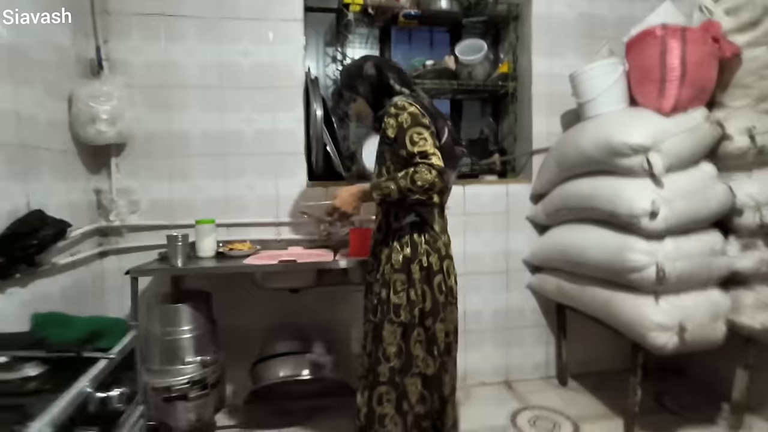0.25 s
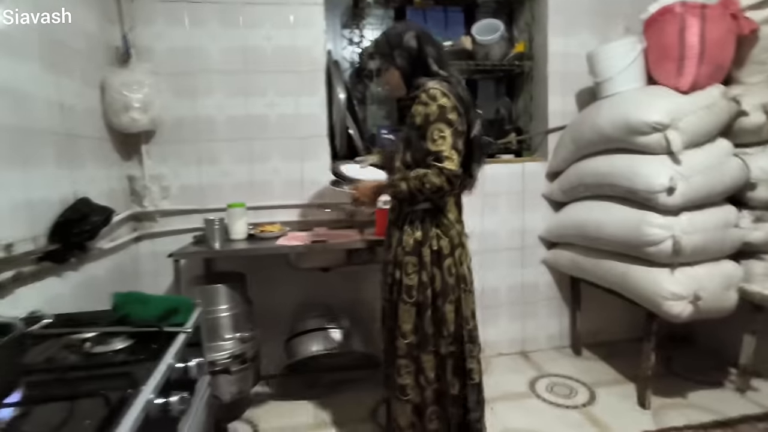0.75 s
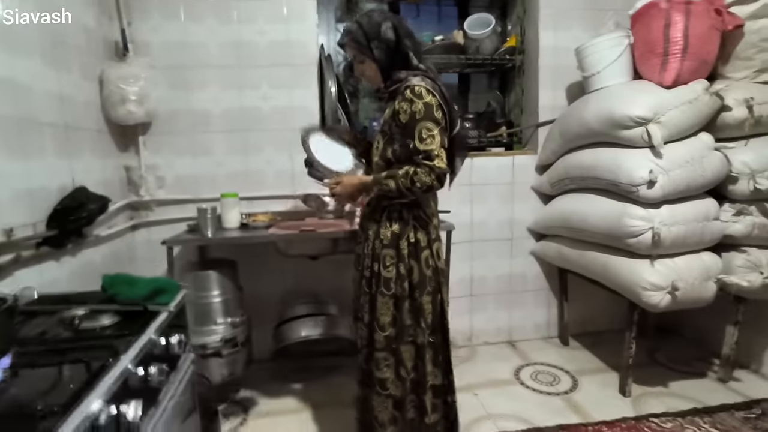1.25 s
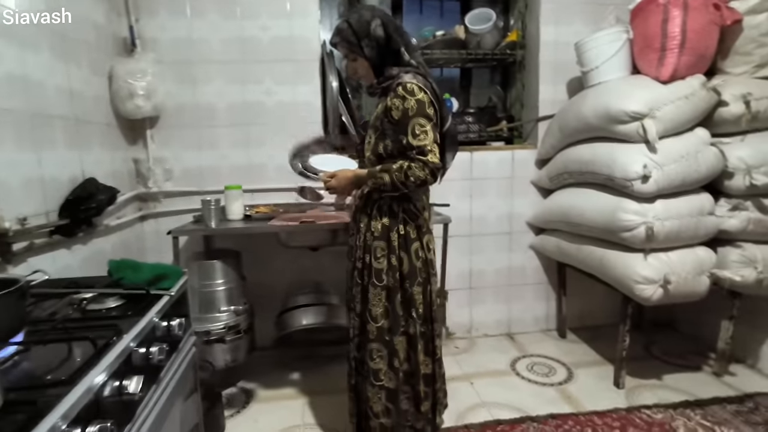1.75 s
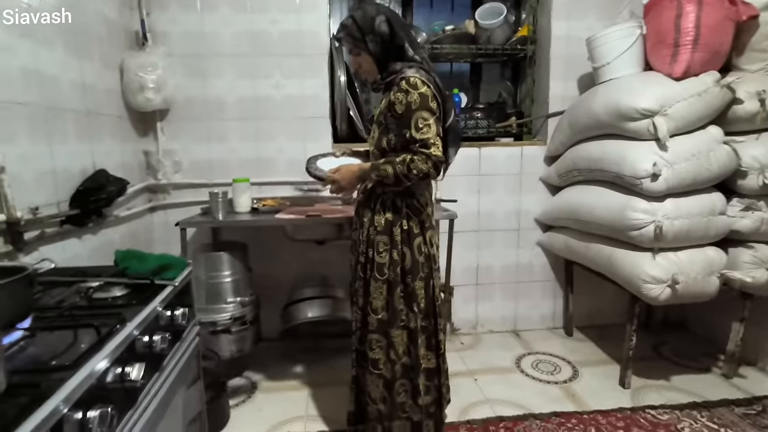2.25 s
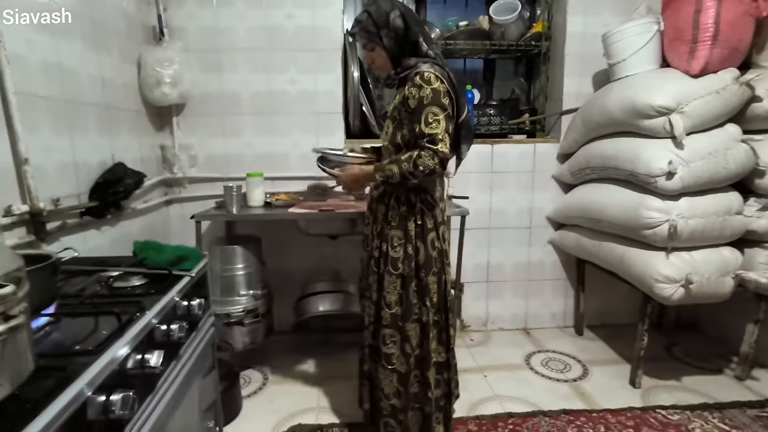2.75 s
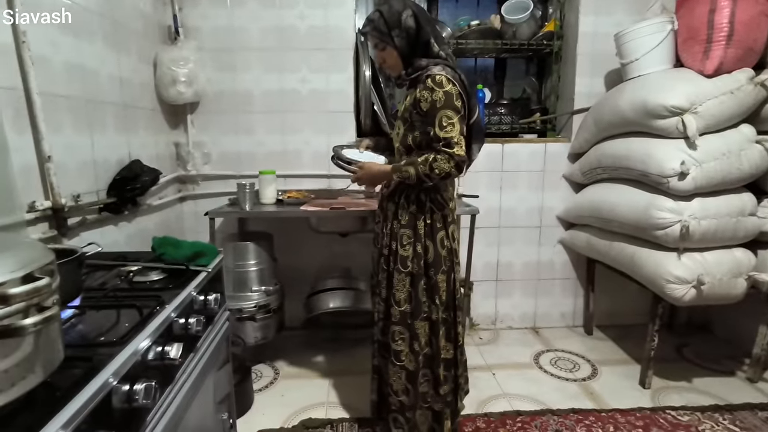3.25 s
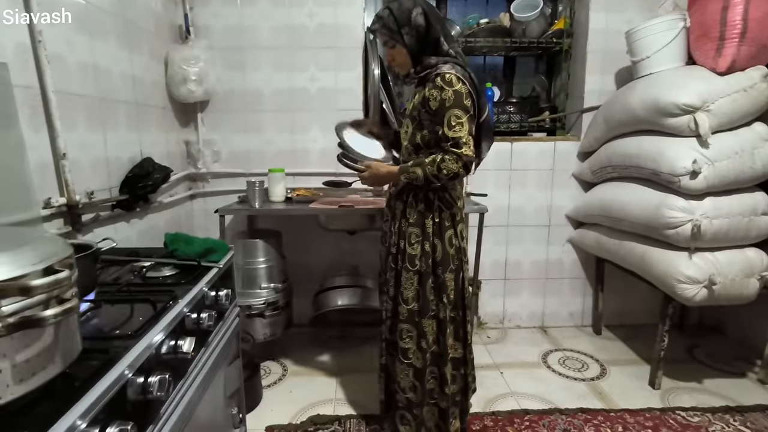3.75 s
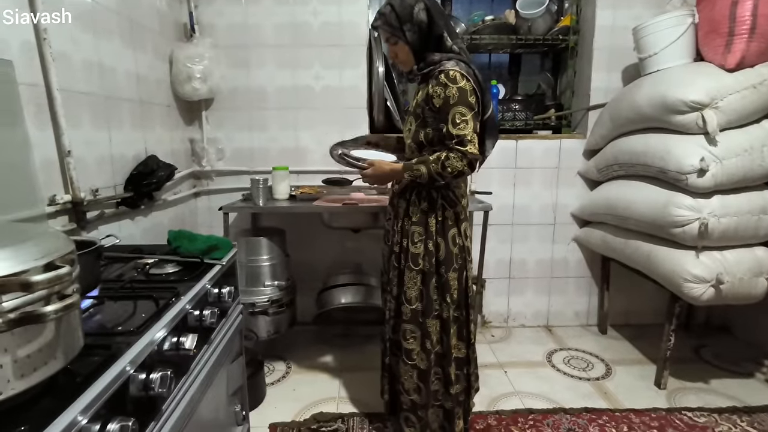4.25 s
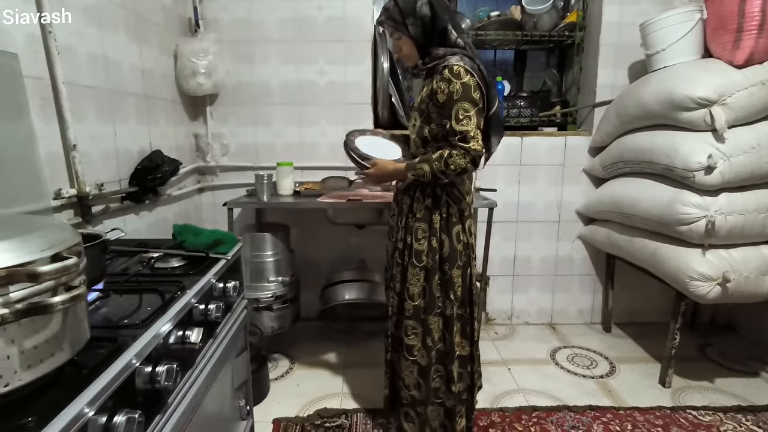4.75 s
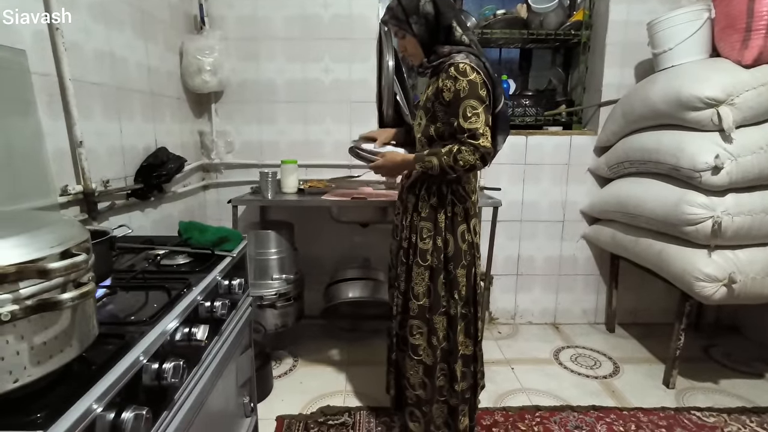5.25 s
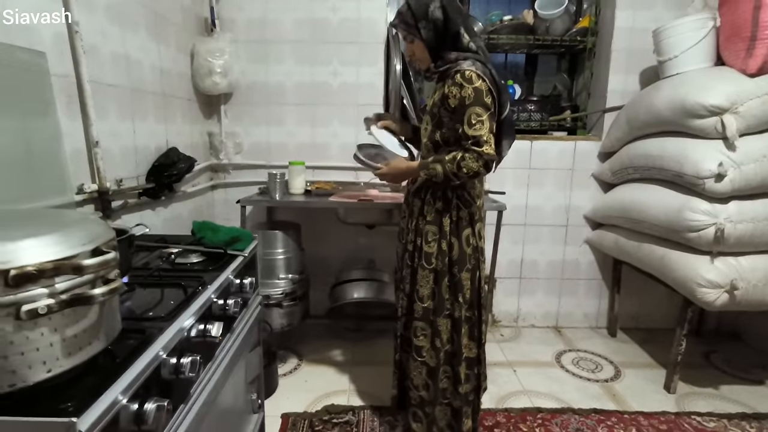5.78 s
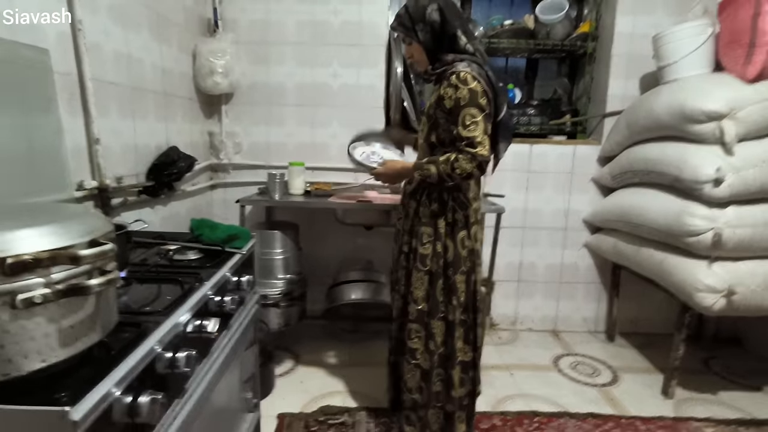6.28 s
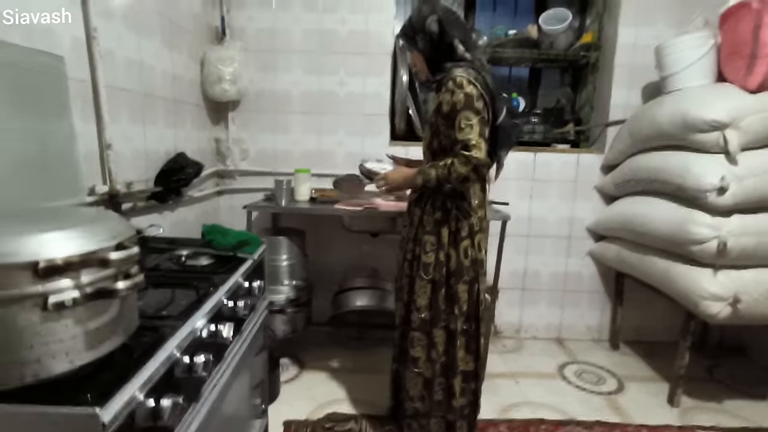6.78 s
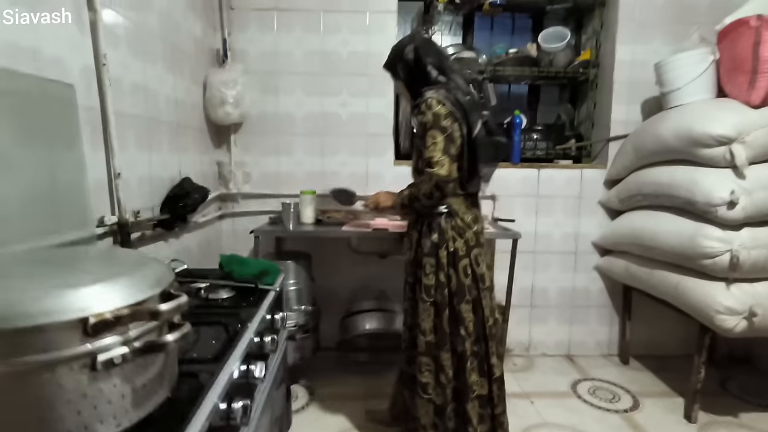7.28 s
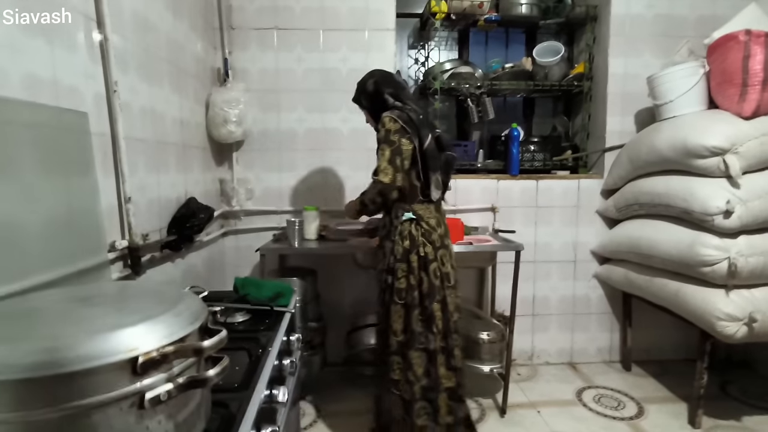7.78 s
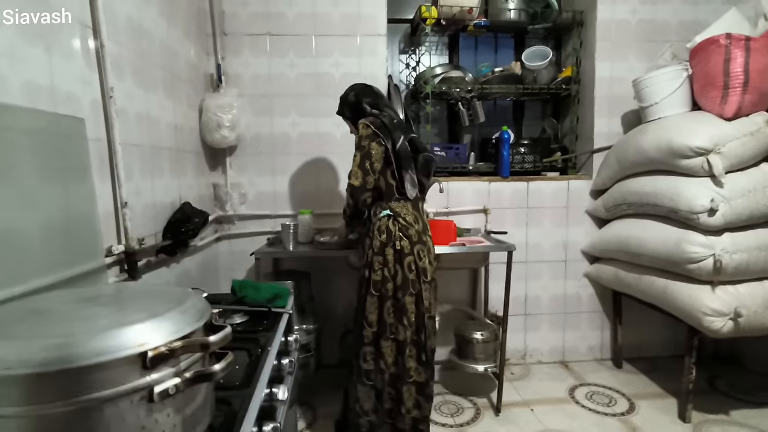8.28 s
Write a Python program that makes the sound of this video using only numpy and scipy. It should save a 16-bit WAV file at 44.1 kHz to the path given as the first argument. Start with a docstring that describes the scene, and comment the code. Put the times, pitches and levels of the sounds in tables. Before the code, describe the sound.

Bright, irregular clinks and clatters come from metal plates being sorted in the hands, each knock leaving a short ring. Rims scratch softly as they slide. Near the end the plates clash and scrape more loudly, and the pile is put down on a metal table with a rattle and low thumps. It is heard from nearby in a small, slightly echoing kitchen with a faint hum and a very high electrical whine.

```python
"""A small tiled kitchen: thin metal plates are lifted one by one and dropped back on a hand-held stack,
which is then put down on a steel table. Each impact chatters and excites the bending modes of the top
plate; sliding rims scratch by stick-slip, and heavy landings thud and set the table top booming.
Behind it are room air, a low hum and a very high electrical whine. The two microphone ports
resonate near 7 and 8 kHz."""
import sys
import numpy as np
from scipy import signal
from scipy.fft import rfft, irfft
from scipy.io import wavfile

SR = 44100
rng = np.random.default_rng(int(sys.argv[2]) if len(sys.argv) > 2 else 0)


def generate_wav(signal):
    """Clip the signal to [-1, 1] and save it as 16-bit WAV at the path in sys.argv[1]."""
    frames = np.transpose(np.atleast_2d(signal))
    scaled = np.clip(frames, -1, 1) * 32767
    pcm = np.round(scaled).astype(np.int16)
    wavfile.write(sys.argv[1], SR, pcm)


N = 375732
SIZE, ATTACK_SIZE = 32768, 1764  # samples in one event and in its attack
AGE, BINS = np.arange(SIZE) / SR, np.fft.rfftfreq(SIZE, 1 / SR)  # an event's t/s and f/Hz

# clear normal modes of each plate or stack: f/Hz, level/dB, nominal T60/s
DEEP_PLATE = [(468, 0, .4), (899, -13, .4), (2160, -11, .35), (6406, -20, .3), (8452, -12, .2)]
WIDE_PLATE = [(738, 0, .39), (1470, -19, .35), (2164, -11, .3), (2735, -20, .3), (7080, -14, .28)]
SMALL_PLATE = [(727, -4, .45), (974, -3, .28), (1453, -8, .4), (1798, -8, .35), (3285, -1, .38),
               (4010, 0, .42), (5453, -2, .25), (6374, -1, .35)]
STACK = [(667, 5, 0.35), (701, -16, 0.088), (1070, -32, 0.75), (1428, 5.5, 0.47), (2125, 9, 0.44),
         (3300, -26, .35), (6200, 4, 0.31), (7150, -3, 0.2)]
SHALLOW_PLATE = [(550, -33, 0.38), (1660, -18, 0.25), (2184, 6.5, 0.076), (2800, -20, 0.76),
                 (4460, -9, 0.48), (5200, 1, 0.08), (7467, -10, 0.21)]
FULL_STACK = [(515, 2.5, 0.23), (880, -1, 0.91), (2160, 4.5, 0.35), (5140, -11, 0.27), (5330, -11, 0.26),
              (6160, 0, 0.44), (7250, -20, 0.25), (7130, -2, 0.31), (7240, -9, 0.18)]
STACK_ON_TABLE = [(1766, -10, .3), (2183, -6, .4), (2950, -7, .3), (3564, -8, .35), (4440, -4, .3),
                  (5572, 0, .4), (6158, -4, .55), (6530, 1, .3), (8461, -2, .25)]
# what lies on top: from t/s, modes, hollow knock f/Hz, its bandwidth/Hz, relative body level/dB
ON_TOP = [(0, DEEP_PLATE, 490, 45, -3), (.3, WIDE_PLATE, 760, 80, -3.5), (1.3, SMALL_PLATE, 770, 300, -2),
          (1.9, STACK, 696, 110, 1.5), (2.4, SMALL_PLATE, 440, 110, -3.5), (2.7, STACK, 687, 70, -1),
          (4.45, STACK, 820, 300, -2.5), (4.7, SHALLOW_PLATE, 583, 60, -2),
          (4.85, SHALLOW_PLATE, 710, 116, -2.5), (5.5, WIDE_PLATE, 730, 70, -1.5),
          (6.5, FULL_STACK, 630, 302, -4), (6.65, FULL_STACK, 740, 140, 0.5),
          (6.75, FULL_STACK, 614, 200, -4.5), (7.5, FULL_STACK, 480, 139, -4),
          (8, STACK_ON_TABLE, 560, 140, -6.5)]
# spectral envelope of the dense modes of sheet metal: f/Hz, level/dB
SHEET_SPECTRUM = [(40, -27), (90, -19.5), (130, -9), (250, -3), (390, 1.5), (500, 3), (650, 0.5),
                  (1000, 1.5), (2200, 4), (4500, 1), (7000, 1), (10000, -5.5), (14000, -6)]


def amp(db):
    """Amplitude ratio of a level in decibels."""
    return 10 ** (np.asarray(db) / 20)


def rms(x):
    """Root mean square."""
    return np.sqrt(np.mean(x ** 2) + 1e-20)


def read(points, hz):
    """Interpolation of a table on a log-frequency axis."""
    f, value = np.transpose(points)
    return np.interp(np.log(hz + 1), np.log(np.sort(f) + 1), value)


def add(mix, s, sound):
    """Superposition: a stereo sound joins the mix at time s."""
    part = mix[:, max(round(s * SR), 0):][:, :sound.shape[1]]
    part += sound[:, :part.shape[1]]


def causal(db):
    """Minimum phase: the response with these gains that rings only after its cause."""
    log_gain = np.log(amp(db))
    return np.exp(np.conj(signal.hilbert(np.r_[log_gain, log_gain[-2:0:-1]])))[:len(db)]


def drift(rate_hz):
    """Low-pass noise: a random wander of unit RMS."""
    wander = irfft(rfft(rng.standard_normal(N)) / (1 + (np.fft.rfftfreq(N, 1 / SR) / rate_hz) ** 4), N)
    return wander / rms(wander)


def swell(rise_s):
    """Exponential build-up of a vibration."""
    return 1 - np.exp(-AGE / rise_s)


def port_pair(size, alike_hz=520):
    """Diffuse-field noise spectra at two ports: coherent in the bass, unrelated in the treble."""
    common, separate = rfft(rng.standard_normal((2, size)))
    coherence = 1 / (1 + (np.fft.rfftfreq(size, 1 / SR) / alike_hz) ** 2)
    return np.array([common, coherence * common + np.sqrt(1 - coherence ** 2) * separate])


def room_air(level_db=-54):
    """A diffuse field of steady noise whose level flickers slightly."""
    spectrum = [(25, -41), (50, -30), (75, -11), (125, -6.5), (190, -1), (260, -2), (350, -5), (550, -5.5),
                (900, -17), (2000, -15), (4000, -22.5), (7300, -14.5), (12000, -20.5), (15000, -118)]  # f/Hz, relative spectral level/dB
    air = irfft(port_pair(N) * amp(read(spectrum, np.fft.rfftfreq(N, 1 / SR))), N)
    return amp(level_db + drift(27)) * air / rms(air)


def hum(waver_hz=2, flutter_db=2.0):
    """Low tones under random amplitude and frequency modulation."""
    partials = [(124, -72), (244, -59), (282, -60)]  # f/Hz, level/dB
    out = np.zeros(N)
    for hz, db in partials:
        strength = amp(db + flutter_db * drift(4.1))
        out += strength * np.sin(2 * np.pi * np.cumsum(hz + waver_hz * drift(11.6)) / SR)
    return np.sqrt(2) * out


def whine(hz=15271, gain_db=2.5, hiss_db=-22, hiss_hz=170, flutter_db=2.0, sway_db=3, sway_rad=2):
    """An electrical tone in faint hiss swells and fades as the microphone moves through standing waves."""
    path = [(0, -44, -3), (0.95, -40.5, 16.0), (1.45, -42.5, 8), (2.1, -49.5, 5), (3.15, -39.0, 10),
            (3.75, -49, -2), (4.4, -45.5, 5), (4.8, -40.5, 3), (5.3, -45.5, -2.0), (6.6, -40, 8.0),
            (7.05, -45.5, 7), (8.2, -43.5, -5), (8.5, -42, 2)]  # t/s, relative level/dB, left minus right/dB
    times, *columns = np.transpose(path)
    db, pan_db = (np.interp(np.arange(N) / SR, times, column) for column in columns)
    tone = np.exp(2j * np.pi * np.cumsum(hz + 5 * drift(20)) / SR)
    ports = []
    for side in (1, -1):
        strength = amp(sway_db * drift(4.3) + flutter_db * drift(50))
        phasor = np.exp(1j * sway_rad * drift(2.87))
        hiss = amp(hiss_db) * (drift(hiss_hz) + 1j * drift(hiss_hz))
        ports.append(amp(gain_db + db + side * pan_db / 2) * np.real(tone * (strength * phasor + hiss)))
    return np.sqrt(2) * np.array(ports)


def kitchen(direct_db=-9, early_db=-6, early_s=0.0084, build_s=0.004, lead_s=.00008):
    """Room transfer function from one spot: direct sound, early tile reflections and a diffuse tail."""
    reverberation = [(120, 0.75), (400, 0.58), (1000, 0.43), (2800, 0.41), (7300, 0.34), (13000, 0.23)]  # f/Hz, T60/s
    hz, t, noise = signal.stft(irfft(port_pair(SIZE)), SR, nperseg=256)
    decay = amp(-60 * t / read(reverberation, hz)[:, None])
    tail = signal.istft(noise * decay, SR, nperseg=256)[1][:, :SIZE] * swell(build_s)
    early = rng.standard_normal((2, SIZE)) * (rng.random((2, SIZE)) < .04) * np.exp(-AGE / early_s)
    early /= np.linalg.norm(early, axis=1, keepdims=True)
    direct = np.exp(-2j * np.pi * BINS * np.array([[0], [lead_s]]))  # reaches the left port first
    near = amp(early_db) * rfft(early) + amp(direct_db) * direct
    mid_dip = amp(read([(300, -0.073), (2000, -2.0), (8000, -0.22)], BINS))
    return rfft(tail / np.linalg.norm(tail[0])) + near * mid_dip


def blows(hard_db=-28, usual_db=-34, body_per_db=-0.2127):
    """Impact and rebound: in a hard landing the rim grazes, then the plate hits, hops and lands again."""
    # plate contacts: t/s, level/dB, relative treble/dB, relative free ring/dB, chatter time/ms
    contacts = [(0.001, -22, -0.5, -3.5, 2.2), (0.068, -37, -2, 7.5, 8), (0.39, -44.5, -0.5, -1, 1.4),
                (0.7757, -24, 5, 1, 3.4), (0.799, -28, -3, 9, 0.72), (0.8461, -35.5, 8, 14.5, 2.3),
                (0.9912, -34.5, -1, -7, 1.7), (1.1601, -46, 5.5, -21, 2), (1.3658, -27.5, 6.5, -0.5, 1),
                (1.9687, -25, 6, -16, 2.8), (2.0803, -35.5, 3, 3, 11), (2.1207, -26, 6, -11, 2.2),
                (2.1746, -31, 1.5, -0.5, 16), (2.478, -39.5, -6.5, -12, 2.5), (2.527, -34.5, 9, 2.5, 1.6),
                (2.6086, -38, 4, -5, 3.8), (2.7483, -29, 5.5, -5, 2.7), (2.875, -39.5, -6.5, -3, 2.9),
                (2.9278, -40.5, 1, 0, 4.3), (3.0615, -43, 7, 1, 7.6), (3.099, -31.5, -0.5, -3, 1.5),
                (3.183, -46, -6, -1, 4.3), (3.2403, -37.5, 2, -3, 1.6), (3.3658, -42.5, -3, -4.5, 3.4),
                (3.7208, -37, -2, -7.5, 1.1), (3.8542, -35.5, -6.5, -6, 24), (3.8912, -32, 7, -3, 2.6),
                (4.0478, -41, -4.5, -16, 9), (4.1157, -39, 1.5, -3, 0.53), (4.3649, -25.5, 5.5, -22, 5),
                (4.483, -36.5, -3.5, -15, 2.7), (4.5218, -25, -1, -3.5, 5.7), (4.6755, -42, 3.5, -19, 1),
                (4.7602, -37, -6, -18, 2), (4.7786, -25.5, -3.5, 2, 6.3), (4.907, -39.5, -0.5, -2, 3.8),
                (4.9619, -33, 1, -20, 1.3), (5.0401, -35.5, -5, -8, 6.7), (5.1214, -43.5, 5, 6, 2),
                (5.3431, -34.5, -1.5, -32.5, 4.2), (5.5983, -53, -4, -16, 3.9), (5.709, -40.5, -1, 1.5, 7),
                (6.1086, -52.5, 1.5, -14, 3.5), (6.5817, -27, 5, -32, 14), (6.678, -23, 0, -9.5, 6.3),
                (6.805, -17, -1.5, -10, 3.8), (7.0424, -41.5, -7.5, -8, 1.6), (7.2465, -34.5, -8, -14, 2.7),
                (7.3204, -36.5, -1, -5.5, 1), (7.618, -27, -2.5, -7, 0.6), (7.85, -46.5, -6, -11, 2),
                (8.0964, -22, -1.5, -22, 27), (8.149, -32, 9.5, 12, 53), (8.272, -31, -1, -1.5, 4),
                (8.381, -32.5, -2, -19, 66), (8.4405, -22, 0.5, -10, 12)]
    graze_s, graze_db, rebound_s, rebound_db = 0.021, -29, .043, -10.5
    for s, db, bright_db, free_db, chatter_ms in contacts:
        on_top = sum(start <= s for start, *_ in ON_TOP[1:])
        _, _, *knock, body_db = ON_TOP[on_top]
        body_db += body_per_db * (db - usual_db)  # the harder the blow, the smaller its share of body
        landing = [(s - graze_s, db + graze_db), (s + rebound_s, db + rebound_db)] if db > hard_db else []
        for at, level in [(s, db)] + landing:
            yield at, level, body_db, bright_db, free_db, chatter_ms, knock, on_top


def contact(chatter_ms, settle_s=0.00063, bounces_per_s=400, bounce_s=0.0017, touch_s=0.0081):
    """Force envelope of an inelastic impact: the rim touches, the plate settles, tiny bounces die away."""
    bounces = (rng.random(SIZE) < bounces_per_s / SR) * np.minimum(rng.exponential(1, SIZE), 2)
    spikes = signal.lfilter([1], [1, -np.exp(-1 / (SR * bounce_s))], bounces)
    length_s = settle_s + chatter_ms / 1000
    settling = (1 + amp(6) * spikes) * (.5 + swell(length_s)) * np.exp(-AGE / length_s)
    touch = amp(3) * np.exp(-AGE / touch_s) * settle_s / length_s
    return settling + touch


def sheet_modes(count=340, held_t60=0.035):
    """A thin plate has constant modal density; hand and stack damp these modes quickly. One row each."""
    hz = 300 + (np.arange(count) + rng.random(count)) * 13500 / count
    t60 = held_t60 * 2 ** rng.uniform(-1, 1, count)
    t = AGE[:SIZE // 4]
    return np.sin(2 * np.pi * hz[:, None] * t) * amp(-60 * t / t60[:, None])


def hollow(hz, width_hz=70, lift_db=9, below_db=-5):
    """Resonance of the plate's lowest mode, set by what it lies on; well below it, radiation is weaker."""
    resonance = 1 + amp(lift_db) / (1 + 2j * (BINS - hz) / width_hz)
    return resonance * amp(below_db / (1 + (BINS / (0.6 * hz)) ** 6))


def ring(modes, split_hz, detune=0.002, twin_db=-7, apart_hz=900):
    """Free vibration: slight asymmetry splits each mode of a plate into a beating pair."""
    out = np.zeros((2, SIZE))
    for hz, db, t60 in modes:
        pitch = hz * (1 + detune * rng.standard_normal())
        beat = split_hz * (.5 + rng.random())
        pair = np.exp(2j * np.pi * pitch * AGE) * (1 + amp(twin_db) * np.exp(2j * np.pi * beat * AGE))
        # high modes reach the ports out of step
        lag = min(hz / apart_hz, np.pi / 2) * rng.choice([-.5, .5]) * np.array([[1], [-1]])
        phase = 2 * np.pi * rng.random() + lag
        envelope = amp(db - 60 * AGE / np.clip(t60, .05, .8))
        out += (np.exp(1j * phase) * pair * envelope).real
    return out / rms(out[:, :ATTACK_SIZE])


def plates(sheet_db=-5, ring_db=-2, body_hz=1100, bright_hz=4500, grip_s=.11, damp_db_per_s=67):
    """Impact excitation: each blow rattles the rims and rings the top plate until fingers damp it."""
    out, sheet, colour = np.zeros((2, N)), sheet_modes(), causal(read(SHEET_SPECTRUM, BINS))
    spots = [kitchen(direct_db=-6.5, early_db=-1.5, early_s=0.0098, build_s=0.0051) for _ in range(12)]
    fingers = amp(-damp_db_per_s * np.maximum(AGE - grip_s, 0))
    rings = [ring(modes, split_hz=14.1, detune=0.0012, twin_db=-10.5) * swell(0.00058) * fingers
             for _, modes, *_ in ON_TOP]
    low = 1 / (1 + (BINS / body_hz) ** 8)
    high = 1 - 1 / (1 + (BINS / bright_hz) ** 8)
    slow, quick = swell(0.0011), swell(0.000077)  # low modes speak later than high ones
    snap = 1 + np.exp(-AGE / 0.0028)  # the treble is strongest while the rims touch
    for k, (s, db, body_db, bright_db, free_db, chatter_ms, knock, on_top) in enumerate(blows()):
        metal = rng.standard_normal(len(sheet)) @ sheet  # where the rim is hit decides which modes speak
        rattle = rng.standard_normal(SIZE) * contact(chatter_ms)
        blow = rfft(rattle / np.linalg.norm(rattle))
        blow += amp(sheet_db) * rfft(metal / np.linalg.norm(metal), SIZE)
        heard = blow * colour * hollow(*knock) * spots[k % len(spots)]
        bands = (low, body_db, slow), (1 - low - high, 0, quick), (high, bright_db, snap)
        for band, band_db, onset in bands:
            part = (irfft(heard * band) * onset)[:, :SIZE - ATTACK_SIZE]
            add(out, s, amp(db + band_db) * part / rms(part[:, :ATTACK_SIZE]))
        add(out, s, amp(db + free_db + ring_db) * rings[on_top])
    return out


def slides(slips_per_s=260, slip_s=0.00065, dull_db=-8):
    """Stick-slip friction: a sliding rim is a run of tiny slips, each a scratch on the hollow plate."""
    strokes = [(1.106, 1.402, -59.5), (2.451, 2.5, -41.5), (3.42, 3.88, -55.5), (5.019, 5.125, -43),
               (5.757, 6.185, -50), (6.597, 6.79, -32.5), (8.135, 8.345, -39)]  # rim over rim: start t/s, end t/s, level/dB
    out = np.zeros((2, N))
    colour = causal(read(SHEET_SPECTRUM, BINS) + read([(1500, 0), (9000, dull_db)], BINS)) * hollow(hz=700)
    for start, end, db in strokes:
        arch = np.sin(np.pi * np.minimum(AGE / (end - start), 1))
        slips = (rng.random(SIZE) < slips_per_s / SR) * rng.exponential(1, SIZE) * arch
        scratch = signal.lfilter([1], [1, -np.exp(-1 / (SR * slip_s))], slips) * rng.standard_normal(SIZE)
        rub = irfft(rfft(scratch) * colour * kitchen())
        add(out, start, amp(db) * rub / rms(rub[:, AGE < end - start]))
    return out


def thuds(push_s=0.02, rise_s=0.013):
    """Momentum transfer: the landing stack sends a dull push into the room, and the table top booms."""
    landings = [(4.54, -50, 5), (6.68, -52, 11.5), (6.839, -41.5, -25), (8.103, -24.5, -22),
                (8.15, -41, -20), (8.391, -34.5, 4), (8.447, -28.5, 7.5), (8.484, -34, 14)]  # t/s, level/dB, relative boom level/dB
    spectrum = [(40, -21), (90, -24.5), (140, -6), (220, -2.5), (290, 7.5), (380, -5), (550, -8), (900, -4),
                (2000, -58)]  # of the push: f/Hz, level/dB
    table_modes = [(129.3, 4.5, 0.23), (178, -11, 0.46), (267.7, -11.5, 0.18), (402, 5, 0.051)]  # f/Hz, level/dB, T60/s
    out, colour = np.zeros((2, N)), causal(read(spectrum, BINS))
    for s, db, boom_db in landings:
        force = rng.standard_normal(SIZE) * np.exp(-AGE / push_s)
        push = irfft(rfft(force) * colour * kitchen())
        boom = amp(boom_db) * ring(table_modes, split_hz=1) * swell(rise_s)
        add(out, s, amp(db) * (push / rms(push[:, :2 * ATTACK_SIZE]) + boom))
    return out


def scene():
    """Superposition of plates, table and room."""
    return plates() + slides() + thuds() + room_air() + hum()


def record(dry, ceiling=.8, edge_hz=16000):
    """Port resonance colours each channel; the whine joins, then come soft overload and a band limit."""
    response = [(30, -0.5), (110, -0.5), (5200, -1), (6400, 1.5), (7300, 5.5), (7900, 3), (8250, 9),
                (8470, 9.5), (8650, -1.5), (9000, -2), (12000, -6.5), (14500, -15)]  # mean of both ports: f/Hz, gain/dB
    balance = [(3500, 0.5), (4500, 3), (5600, -2), (6300, -4.5), (6900, 0.5), (7500, -11.5), (7850, -5.5),
               (8400, 32), (9000, 1.5), (10500, 9), (14500, -3)]  # the left port resonates higher: f/Hz, left minus right/dB
    lean_db = np.array([[1], [-1]]) * read(balance, BINS)
    port_db = read(response, BINS) + 10 * np.log10(2 / (1 + amp(-lean_db) ** 2))
    ports = np.array([irfft(causal(db))[:SIZE // 8] for db in port_db])
    heard = signal.oaconvolve(dry, ports, axes=1)[:, :N] + whine()
    saturated = heard / (1 + (heard / ceiling) ** 6) ** (1 / 6)
    lowpass = signal.firwin(255, edge_hz, window=("kaiser", 8), fs=SR)
    return signal.oaconvolve(saturated, lowpass[None], "same")


dry = scene()
out = record(dry)
generate_wav(out)
```